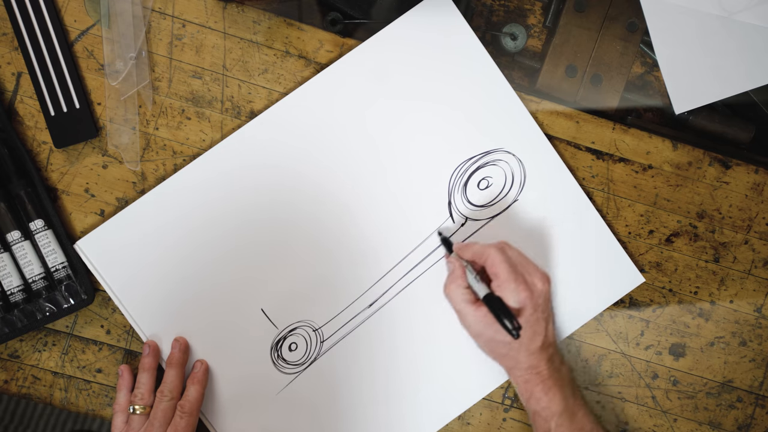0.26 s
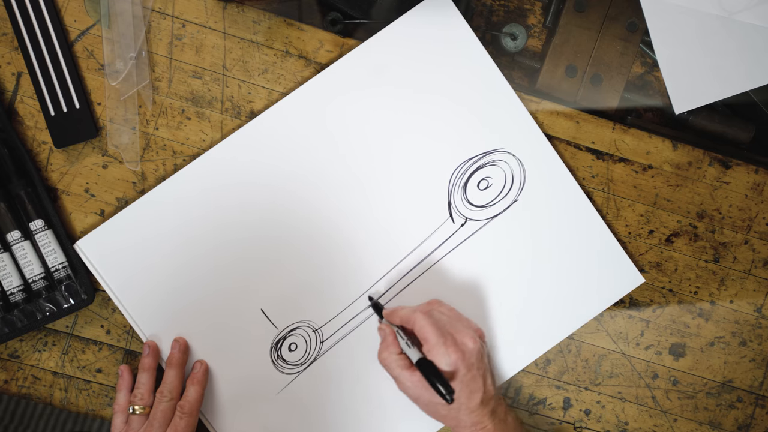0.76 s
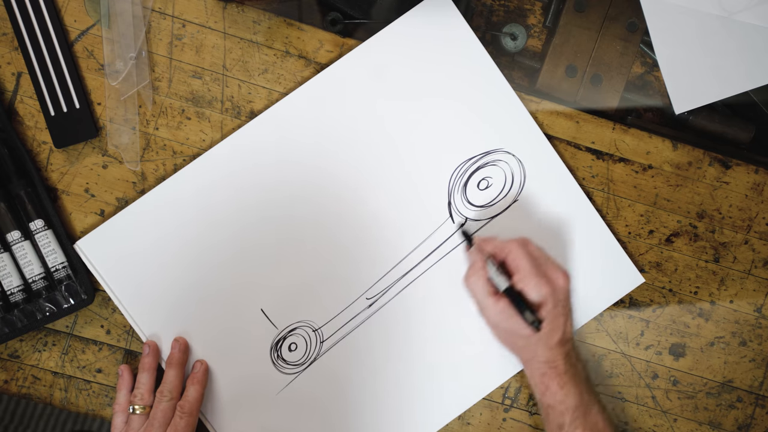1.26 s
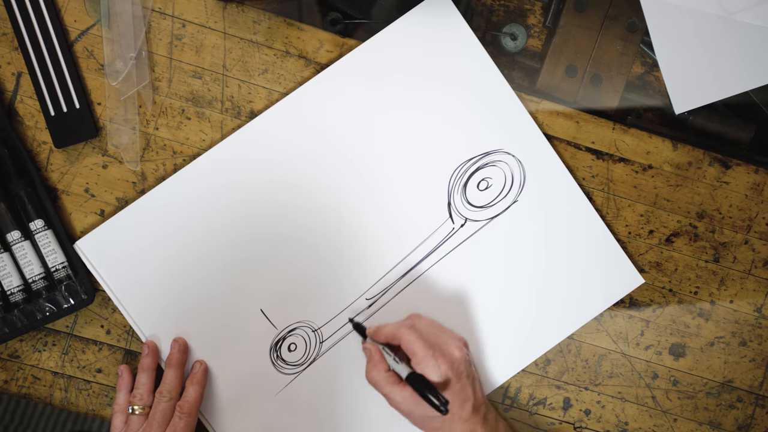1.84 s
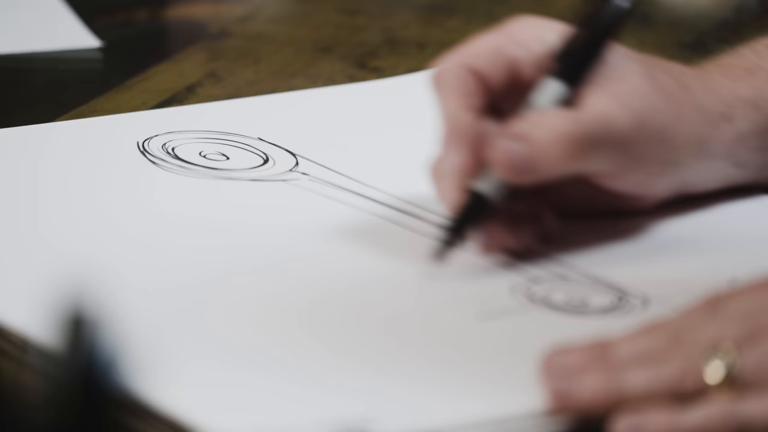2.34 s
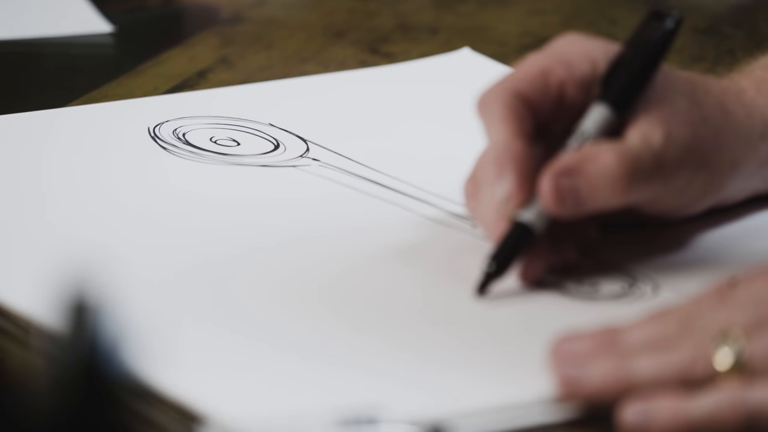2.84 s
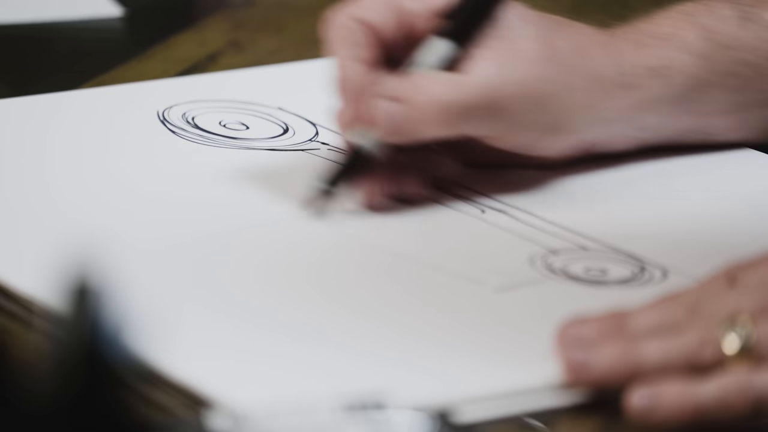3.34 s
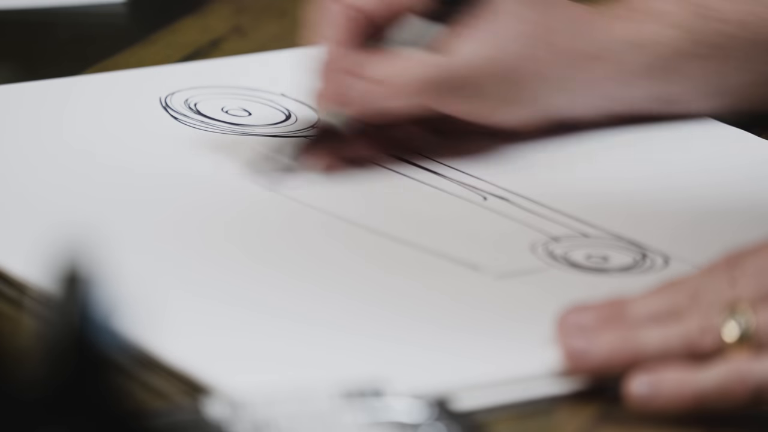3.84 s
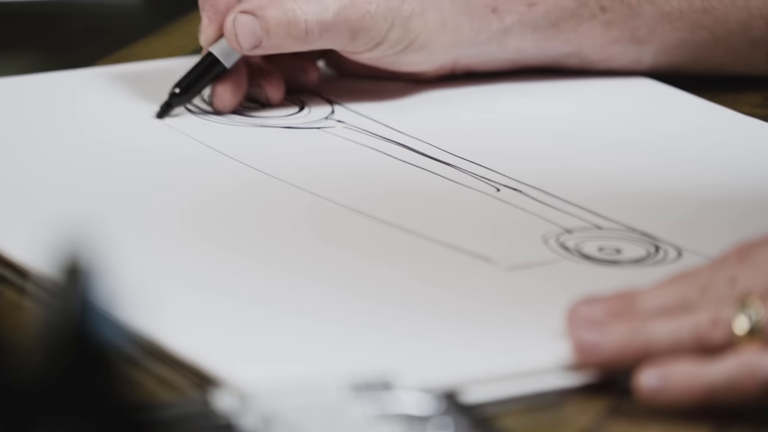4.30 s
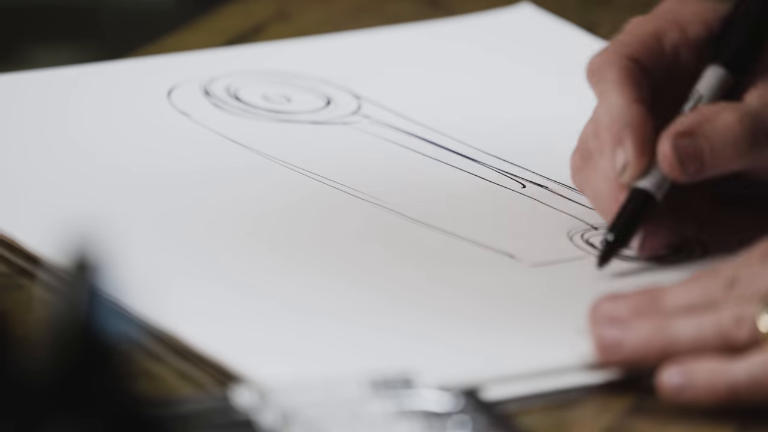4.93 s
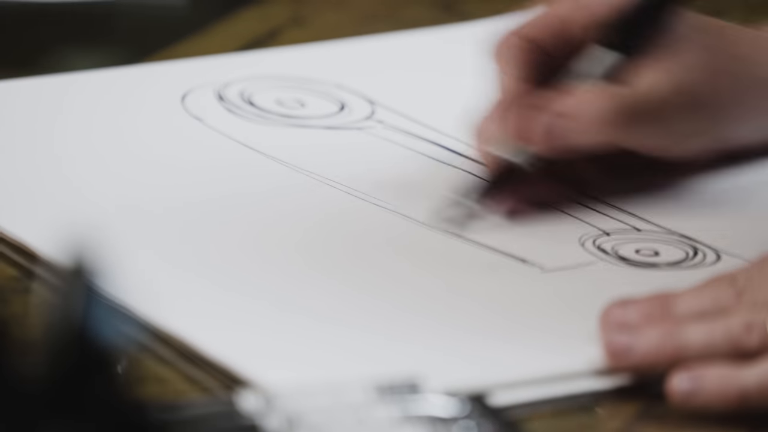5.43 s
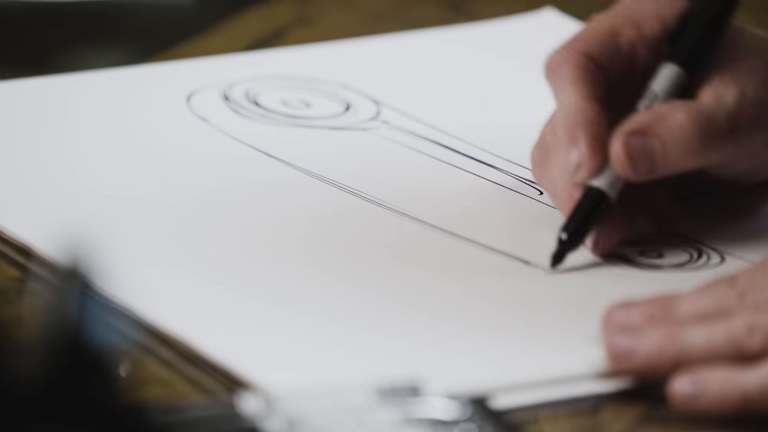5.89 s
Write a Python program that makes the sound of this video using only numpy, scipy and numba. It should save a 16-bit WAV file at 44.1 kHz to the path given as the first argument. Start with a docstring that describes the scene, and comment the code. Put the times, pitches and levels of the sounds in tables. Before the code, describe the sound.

Close, dry swishes of a marker and hand across paper come and go, with light desk bumps between them in a quiet indoor room.

```python
"""One close microphone at a wooden desk, where a felt-tip marker sketches quick lines on a sheet of paper.
A stroke is already under way at the start: filtered fibre clicks make the nib's hiss and the hand's rub,
and at speed the sheet rasps. Midway come lighter slides, small knocks (decaying desk modes) and paper ticks.
Then the strokes return, closer together, with the hardest knock near the end. Beneath it all, softly, lie
forearm rumbles on the wood and the studio's air and ventilation drone, both made of filtered noise."""
import sys
import numpy as np
from scipy import signal
from scipy.fft import rfft, irfft
from scipy.io import wavfile
from scipy.ndimage import map_coordinates
from numba import njit

SR = 44100
rng = np.random.default_rng(int(sys.argv[2]) if len(sys.argv) > 2 else 0)


def inscribe(sig):
    """Save sig as 16-bit PCM at rate SR to the path in sys.argv[1].

    A 1-D sig is mono; a 2-D sig holds one channel per row.
    Samples are clipped to [-1, 1] before scaling.
    """
    pcm = np.round(np.clip(np.atleast_2d(sig).T, -1, 1) * 32767)
    wavfile.write(sys.argv[1], SR, pcm.astype(np.int16))


N = 271435
TIME = np.arange(N) / SR  # s
FREQ = np.maximum(np.fft.rfftfreq(N, 1 / SR), 1)  # Hz

# slides of the hand, out with a stroke or back again; the whole rub is later lowered by about 6 dB:
# [fastest_s, speeding_up_s, slowing_down_s, level_db, skin_hz at half speed, skin_db, treble_db]
HAND_SLIDES = [ (.105, 0.17, 0.15, -42.5, 5600, -3, -0.5), (.335, 0.17, 0.13, -54, 5170, -7.5, -2),
               (.495, 0.099, .07, -67.5, 5400, -5.5, -3), (0.679, 0.13, .125, -50.5, 5460, -2.5, 0.5),
               (.81, 0.13, 0.17, -69.5, 5360, -8, -5), (1.259, 0.14, .145, -44.5, 5630, -2, 1.5),
               (1.455, 0.13, .12, -55.5, 5400, -9, -3), (1.61, 0.091, 0.24, -74, 5500, -1, -1),
               (1.868, 0.12, 0.14, -44, 5540, -2, -2), (2.125, 0.17, 0.12, -60.5, 4770, -6, -1),
               (2.31, 0.12, 0.14, -56, 4870, -4.5, 3), (2.485, 0.16, 0.12, -53, 5133, -8.5, 1),
               (2.62, .085, 0.13, -55.5, 5200, -19, -6), (2.76, .085, 0.12, -59, 5170, -11, -3),
               (3.304, 0.15, .135, -40.5, 5270, -5, 1), (3.505, 0.14, 0.19, -48.5, 5200, -6.5, 1),
               (3.996, .2, 0.16, -38.5, 5470, -5, -2), (4.15, .08, 0.12, -58.5, 5340, -12, -8),
               (4.275, 0.14, .12, -56.5, 5240, -7, -3), (4.556, 0.19, 0.12, -51, 5400, -8, 0.5),
               (4.76, 0.16, 0.084, -53, 5370, -1, 0), (4.935, .19, 0.17, -43, 5140, -3.5, 2),
               (5.175, 0.13, 0.12, -46.5, 5100, -11, 0), (5.345, 0.13, 0.14, -50, 5100, -8, -0.5),
               (5.631, 0.18, 0.15, -37, 5540, -9.5, -3), (5.859, 0.2, 0.27, -46.5, 5230, -6, 1.5),
               (6.2, 0.14, .12, -61.5, 5400, -11.5, 2.5), ]
# friction colour of the hand on paper: [frequency_hz, density_db per Hz]
HAND_COLOUR = [(100, -5), (300, -6), (700, -10), (1100, -4), (2200, -1), (2900, -2), (4200, -1), (7800, -2),
               (10000, -.5), (13000, .5), (15800, -1)]
# nib strokes: [touch_s, pressing_down_s, hold_s, lifting_s, level_db, ring_hz, ring_db at full pressure]
NIB_STROKES = [ (-.03, 0.033, 0.056, 0.12, -37, 9500, -6), (0.588, 0.084, .015, 0.068, -51.5, 12800, -14),
               (1.152, .044, .004, .1, -35.5, 10340, -8), (1.755, 0.062, 0.021, 0.11, -38, 12700, -10),
               (3.173, 0.056, .004, 0.097, -40, 14300, -20), (3.817, 0.05, 0.014, 0.19, -37.5, 8800, -13),
               (4.395, 0.15, 0.014, 0.063, -48, 8400, -11), (4.652, 0.15, 0.035, 0.16, -39.5, 7900, -10.5),
               (5.403, 0.016, .004, 0.016, -61, 9000, -16), (5.446, 0.079, 0.052, 0.15, -39, 8960, -8), ]
# friction colour of the felt on paper: [frequency_hz, density_db per Hz]
NIB_COLOUR = [(200, -26), (700, -23.5), (1500, -23.5), (3000, -17.5), (5000, -27), (7000, -7), (7900, -7),
              (8700, -1), (11000, 0), (12800, 1.5), (14500, 0.5), (16000, 1)]
# rasps of the sheet in the fastest part of a stroke; the resonance acts twice:
# [middle_s, half_length_s to 1/e, level_db, resonance_hz, width_hz of one pass]
SHEET_RASPS = [(0.108, 0.021, -53, 1300, 500), (1.16, 0.031, -69, 1440, 500),
               (1.258, 0.022, -58, 1360, 500), (1.88, 0.023, -54, 1360, 600),
               (3.29, 0.056, -61.5, 1370, 900), (3.98, 0.048, -50.5, 1220, 890),
               (4.008, 0.041, -50, 1810, 800), (4.932, 0.039, -49, 1390, 1000),
               (5.615, 0.047, -50.5, 1190, 890), (5.635, 0.038, -49, 1660, 590)]
# knocks on the desk: [start_s, level_db, favoured_hz, sharp_tick_db]
DESK_KNOCKS = [(0.311, -48, 720, -8), (1.994, -59.5, 840, -23), (2.329, -62, 378, -30),
               (2.503, -61.5, 524, -25), (3.774, -57, 544, -9), (4.675, -46.5, 810, -21),
               (4.767, -55.5, 425, -28), (5.258, -59.5, 760, -25), (5.841, -41, 615, -28)]
# modes of desk and drawing pad: [pitch_hz, level_db before the contact's weighting, t60_s]
DESK_MODES = [(290, -5, 0.077), (368, -3.5, 0.13), (411, -2.5, 0.055), (574, -8.5, 0.053),
              (674.5, 0.5, 0.043), (770, -5.5, 0.045), (897, 0.5, 0.018), (1260, -1.5, 0.045),
              (1580, 8.5, 0.025), (1870, -27, 0.055)]
# the forearm shifts its weight on the desk: [middle_s, half_length_s to 1/e, level_db, rumble_hz]
ARM_SHIFTS = [(0.81, 0.061, -70.5, 366), (1.88, 0.042, -70, 250), (2.966, 0.13, -70.5, 310),
              (4.346, 0.04, -67, 70), (4.907, 0.066, -66.5, 134), (5.59, 0.049, -66.5, 162),
              (5.73, 0.059, -66, 35)]
# small ticks of the paper: [start_s, level_db, pitch_hz]
PAPER_TICKS = [(2.596, -59, 10000), (2.611, -65, 9000), (3.082, -70, 11000), (3.125, -59.5, 6500)]
# studio air: [frequency_hz, density_db per Hz]
AIR_COLOUR = [(20, -4), (45, 9), (62, -20), (100, -7.5), (140, 2), (200, -6), (350, -5), (500, -9),
              (700, -5), (1100, -14.5), (2500, -17.5), (7000, -27), (16000, -43)]
# ventilation drone: [pitch_hz, width_hz, level_db]
VENT_DRONE = [(83.5, 10.3, -69.5), (123, 11, -80)]

RUB_POWER = 1.93  # the rub's amplitude follows the speed of a slide to this power
REST_DB, REST_SKIN_HZ, REST_SKIN_DB = -73.5, 5460, -13  # the resting hand still creeps a little
SHEET_HZ, SHEET_DB = 1524, -13  # sheet under the hand: pitch at half speed, level against the plain rub
TREBLE_HZ = 8100  # the angle of the hand colours the rub above this
AIR_DB = -73
TOP_HZ = 15750  # the recorder's upper limit


def undb(db):
    """Decibels to gain."""
    return 10 ** (np.asarray(db) / 20)


def shape(x, gain):
    """Filter by a gain for each frequency; the result has rms 1."""
    y = irfft(rfft(x) * gain, N)
    return y / np.std(y)


def colour(points):
    """Gain for each frequency, drawn between (Hz, dB) points on a logarithmic frequency axis."""
    hz, db = np.transpose(points)
    return undb(np.interp(np.log(FREQ), np.log(hz), db))


def resonance(hz, width_hz):
    """Response of one damped resonance, 1 at its centre."""
    return 1 / (1 + 1j * (FREQ ** 2 - hz ** 2) / (FREQ * width_hz))


def wander(axis_values, step):
    """Smooth chance along time or frequency, new about every step, from values of spread 1."""
    place = (axis_values - axis_values[0]) / step
    return map_coordinates(rng.standard_normal(4096), [place], order=2, mode="wrap")


def fibres(rate, spread_db):
    """Paper fibres catch and let go: dense tiny clicks of unequal size, rate a second."""
    caught = rng.random(N) < rate / SR
    sign = rng.choice([-1, 1], N)
    size = undb(spread_db * rng.standard_normal(N))
    # a denser stream gets smaller clicks, so the rate alone does not change the level
    return caught * sign * size / np.sqrt(np.minimum(rate / SR, 1))


def bell(middle, half_length):
    """Envelope that swells and fades symmetrically, down to 1/e at the half length."""
    return np.exp(-((TIME - middle) / half_length) ** 2)


@njit
def band(x, hz, width):
    """State-variable band-pass whose centre moves, gain 1 at the centre."""
    y, band_state, low_state = np.empty(len(x)), 0., 0.
    for i in range(len(x)):
        g, damping = np.tan(np.pi * hz[i] / SR), width / hz[i]
        v = (band_state + g * (x[i] - low_state)) / (1 + g * (g + damping))
        band_state = 2 * v - band_state
        low_state = low_state + 2 * g * v
        y[i] = damping * v
    return y


def ridge(x, hz, width_hz):
    """A moving resonance, passed twice for steep skirts; the result has rms 1."""
    once = band(x, hz, float(width_hz))
    twice = band(once, hz, float(width_hz))
    return twice / np.std(twice)


def glide(fastest, rise_s, fall_s):
    """Speed of one slide, 0 to 1: the arm swings it up and brakes it, each in a quarter sine."""
    ramp = np.interp(TIME, [fastest - rise_s, fastest, fastest + fall_s], [0, 1, 0])
    return np.sin(np.pi / 2 * ramp)


def hand():
    """Skin rubs the paper; a faster slide is louder, crosses more fibres and lifts the resonances a little."""
    power = np.full(N, undb(REST_DB) ** 2)
    tone = np.outer([REST_SKIN_HZ, REST_SKIN_DB, 0], power)
    # power-weighted tone: the hand's posture passes from one slide to the next
    for fastest, rise_s, fall_s, db, ring_hz, ring_db, top_db in HAND_SLIDES:
        share = (undb(db) * glide(fastest, rise_s, fall_s) ** RUB_POWER) ** 2
        power = power + share
        tone = tone + np.outer([ring_hz, ring_db, top_db], share)
    skin_hz, skin_db, treble_db = tone / power
    loudness = np.sqrt(power)
    speed = np.sqrt(loudness / loudness.max())
    rub, skin, paper = (fibres(12000 + 25000 * speed, spread_db=3) for _ in range(3))
    lift = 1 + .03 * (speed - .5)

    plain = shape(rub, colour(HAND_COLOUR) * undb(.9 * wander(FREQ, 130)))
    treble = irfft(rfft(plain) / (1 + (TREBLE_HZ / FREQ) ** 6), N)
    plain = plain + (undb(treble_db) - 1) * treble
    skin_ring = undb(skin_db) * ridge(skin, skin_hz * lift, 2400)
    sheet_ring = undb(SHEET_DB) * ridge(paper, SHEET_HZ * lift, 900)
    flutter = undb(-6.0 + .5 * wander(TIME, 0.0097))
    return loudness * flutter * (plain + skin_ring + sheet_ring)


def nib():
    """Felt scratches over the fibres; it rings most around touching down, before it gathers speed."""
    out = np.zeros(N)
    scratch = fibres(15000, spread_db=3.5)
    chatter = fibres(9000, spread_db=3)
    barrel = shape(chatter, resonance(3920, 700) ** 2)  # the pen's barrel sings briefly while the nib bites
    for touch, press_s, hold_s, lift_s, db, ring_hz, ring_db in NIB_STROKES:
        full = touch + press_s
        corners = touch + np.cumsum([0, press_s, hold_s, lift_s])
        pressure = np.interp(TIME, corners, [0, 1, 1, 0])
        pressure = np.sin(pressure * np.pi / 2) ** 2  # the felt gives, so the contact grows gently
        # every tilt of the pen has its own fine pattern of resonances
        hiss = shape(scratch, colour(NIB_COLOUR) * undb(2 * wander(FREQ, 240)))
        ring_decay = np.exp(-np.maximum(TIME - full, 0) / 0.015)
        ring = shape(chatter, resonance(ring_hz, 450) ** 2) * ring_decay
        bite = undb(-16.0) * (1 - pressure) * (TIME < full) * barrel
        out += undb(db) * pressure * (hiss + undb(ring_db) * pressure * ring + bite)
    return out * undb(.8 * wander(TIME, .004))


def sheet():
    """Quick strokes shake the whole sheet, which answers with a low rasp full of close resonances."""
    out = np.zeros(N)
    drag = fibres(12000, spread_db=3)
    stiff = 1 / np.sqrt(1 + (900 / FREQ) ** 12)  # the desk holds the slow bending still
    damped = 1 / np.sqrt(1 + (FREQ / 2100) ** 10)  # the sheets below soak up the quick bending
    for middle, half_length, db, hz, width in SHEET_RASPS:
        close_resonances = undb(2.3 * wander(FREQ, 68.7))
        rasp = shape(drag, stiff * damped * resonance(hz, width) ** 2 * close_resonances)
        out += undb(db) * bell(middle, half_length) * rasp
    return out


def knocks():
    """Pen and knuckles bump the desk; each contact favours some of its modes, and the room answers."""
    out, t = np.zeros(N + SR), TIME[:SR // 2]
    hz, db, t60 = np.transpose(DESK_MODES)[:, :, None]
    crack = shape(rng.standard_normal(N), resonance(1500, 2000) ** 2)[:len(t)] * np.exp(-t / 0.0047)
    push = 1 - np.exp(-t / .0015)  # the modes take a moment to start
    for s, level_db, focus_hz, tick_db in DESK_KNOCKS:
        contact = 1 / np.hypot(1, 2.1 * (hz / focus_hz - focus_hz / hz))
        phase = rng.random(hz.shape)  # each spot on the desk meets the modes differently
        modes = contact * undb(db - 60 * t / t60) * np.sin(2 * np.pi * (hz * t + phase))
        ring = push * np.sum(modes, axis=0)
        direct = ring / np.abs(ring).max() + undb(tick_db) * crack
        # room answer: noise from 5 ms on, decaying by 60 dB in 0.31 s
        room = rng.standard_normal(len(t)) * undb(-60 * t / 0.31) * (t > .005)
        answer = signal.fftconvolve(direct, room / np.linalg.norm(room))[:len(t)]
        start = int(s * SR)
        out[start:start + len(t)] += undb(level_db) * (direct + undb(-0.5) * answer)
    return out[:N]


def burst(s, decay_s):
    """Envelope that starts at once and dies away."""
    return (TIME >= s) * np.exp(-np.abs(TIME - s) / decay_s)


def ticks():
    """The paper gives tiny dry ticks under the fingers: short bursts of band-passed noise."""
    noise = rng.standard_normal(N)
    return sum(undb(db) * burst(s, 0.0023) * shape(noise, resonance(hz, 3400))
               for s, db, hz in PAPER_TICKS)


def forearm():
    """The arm rolls on the wood, and the desk top rumbles softly as broadly resonant noise."""
    drag = rng.standard_normal(N)
    return sum(undb(db) * bell(middle, half_length) * shape(drag, resonance(hz, 0.83 * hz) ** 2)
               for middle, half_length, db, hz in ARM_SHIFTS)


def studio():
    """Soft air noise with the unsteady low drone of ventilation, made of narrow noise bands."""
    air_level = undb(AIR_DB + .5 * wander(TIME, 0.45))
    air = air_level * shape(rng.standard_normal(N), colour(AIR_COLOUR))
    drone = sum(undb(db) * shape(rng.standard_normal(N), resonance(hz, width))
                for hz, width, db in VENT_DRONE)
    return air + drone


def scene():
    """One microphone hears everything, the same in both channels."""
    mono = hand() + nib() + sheet() + knocks() + ticks() + forearm() + studio()
    return np.array([mono, mono])


def record(dry):
    """The recorder cuts the top steeply, with an elliptic low-pass."""
    return signal.sosfilt(signal.ellip(12, .1, 80, TOP_HZ, fs=SR, output="sos"), dry)


dry = scene()
out = record(dry)
inscribe(out)
```